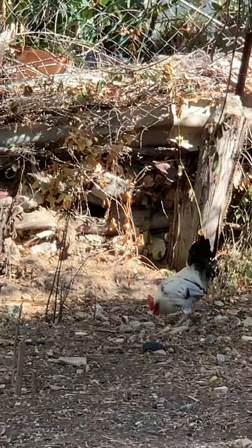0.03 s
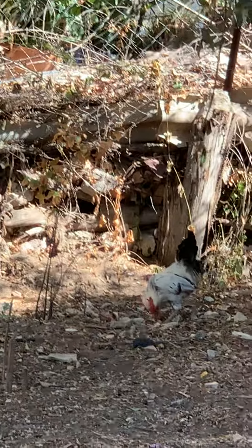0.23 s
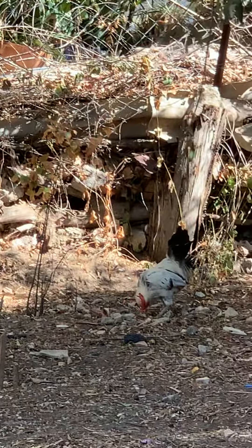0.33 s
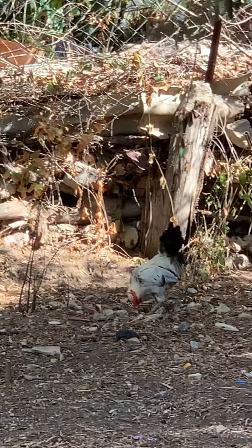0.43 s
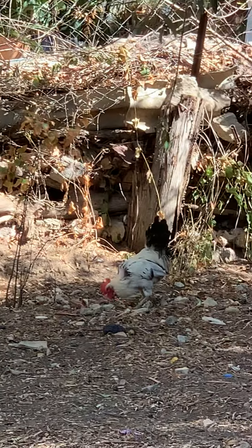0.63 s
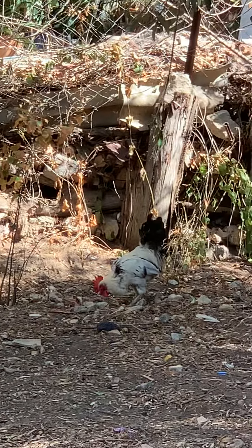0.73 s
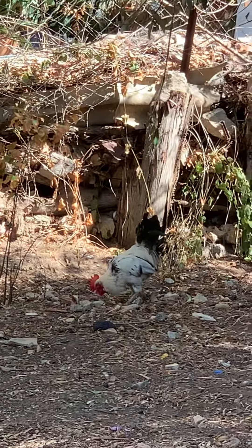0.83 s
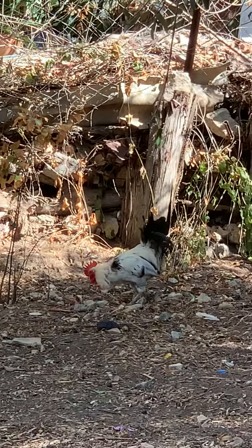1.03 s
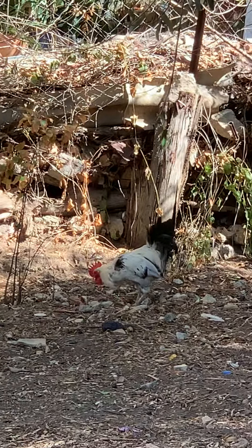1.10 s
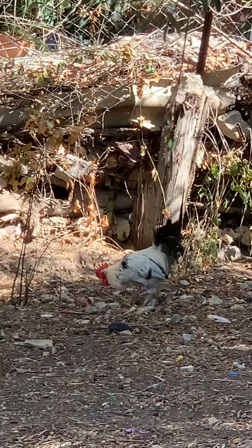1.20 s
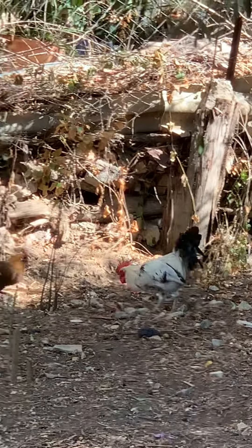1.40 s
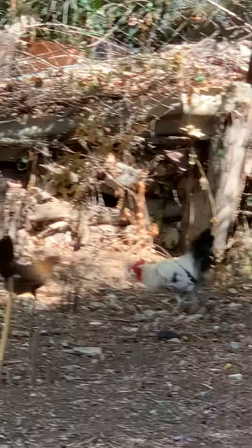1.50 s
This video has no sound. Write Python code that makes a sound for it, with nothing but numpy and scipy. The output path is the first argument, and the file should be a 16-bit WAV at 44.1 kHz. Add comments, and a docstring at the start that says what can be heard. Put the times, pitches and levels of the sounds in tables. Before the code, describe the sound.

A foraging rooster rakes dry stalks and stones with quick, crisp scratches and low, damped pecks. Outdoors, wind thumps and rustles on the microphone before easing, leaving faint hiss, a few quiet pecks and a light sweep.

```python
"""A yard with dry ground, where a rooster forages: three quick scratches, a few dull pecks, a light brush.
His claws snap and rub through the litter and set stalks and stones ringing; each peck is a low, damped knock.
Wind buffets the phone and rustles for the first half, then drops to a low rumble
under a faint, high outdoor hiss."""
import sys
import numpy as np
from scipy import signal
from scipy.fft import rfft, irfft
from scipy.io import wavfile

SR = 44100
rng = np.random.default_rng(int(sys.argv[2]) if len(sys.argv) > 2 else 0)


def unload_audio(sound):
    """Save the sound as a 16-bit wav file, at the path given as the first command line argument."""
    columns = np.transpose(np.atleast_2d(sound))
    # keep every value between -1 and 1, then stretch to whole-number steps
    steps = np.round(np.clip(columns, -1, 1) * 32767)
    wavfile.write(sys.argv[1], SR, steps.astype(np.int16))


N = 68355

# Soft, dark tone of wind rustle and kicked-up dust. Each row: frequency in Hz, relative level in dB.
RUSTLE_COLOUR = [(60, -8), (160, -2), (300, -2.5), (500, -6), (1000, -13.5), (1500, -17), (2400, -23.5),
                 (4800, -27.5), (7000, -37.5), (10000, -49.5)]


def undb(db):
    return 10 ** (np.asarray(db) / 20)


def times():
    return np.arange(N) / SR


def freqs():
    return np.arange(N // 2 + 1) * SR / N


def curve(at, rows):
    """Straight lines through a table of points."""
    rows = np.array(rows, float)
    return np.interp(at, rows[:, 0], rows[:, 1])


def colour(points):
    """An EQ curve: gain per bin from (Hz, dB) points."""
    hz, db = np.array(points, float).T
    return undb(np.interp(np.log(freqs() + 1), np.log(hz), db))


def bell(offset, width):
    """A smooth hump of height 1."""
    return np.exp(-.5 * (offset / width) ** 2)


def shaped(x, gain):
    """Filter, then bring to rms 1."""
    y = irfft(rfft(x) * gain, N)
    return y / np.sqrt(np.mean(np.abs(y) ** 2))


def at_ports(pair, gain):
    """Two unrelated signals become left and right, as alike as the microphone ports hear them."""
    # How alike the two ports sound. Each row: frequency in Hz, likeness from 0 to 1.
    likeness = [(700, 1), (950, 0.99), (1300, 0.21), (2000, 0.45), (2700, 0.89), (3900, 0.17), (4900, 0.85),
                (5900, .45), (7200, 0.57), (8500, 0.33), (9400, 1), (11000, 0.82), (12300, .99), (14000, 1)]
    alike = curve(freqs(), likeness)
    mid, side = irfft(rfft(pair) * np.sqrt([1 + alike, 1 - alike]), N)
    return shaped(np.array([mid + side, mid - side]), gain)


def noise(gain):
    """Coloured stereo noise of rms 1."""
    return at_ports(rng.standard_normal((2, N)), gain)


def wander(rate_hz):
    """A smooth random modulator of rms 1."""
    return shaped(rng.standard_normal(N), bell(freqs(), rate_hz))


def scratches():
    """Claws drag jerkily through litter: snaps and friction ring stalks and stones, damped by soil."""
    # Claw strokes. Each row: start and crest in seconds, level at each in dB, release in seconds.
    strokes = [(-.01, 0.002, -47, -63, 0.023), (0.034, 0.1, -66.5, -50.5, 0.04),
               (0.189, 0.251, -58.5, -48.5, 0.0091), (0.275, 0.32, -65.5, -63.5, 0.12),
               (.343, 0.393, -52.5, -53, 0.037)]
    # Crisp tone of dry litter. Each row: frequency in Hz, relative level in dB.
    litter_colour = [(700, -26.5), (1500, -16.5), (2500, -10), (3900, -11), (5000, 1), (5800, -10),
                     (7100, -11.5), (8200, -25.5), (9500, -49)]
    # Resonances of stalks and stones. Each row: pitch in Hz, width in Hz, relative level in dB.
    rings = [(2720, 42, -3.5), (3320, 130, -9), (3897, 37, -3), (4196, 170, -4), (4490, 88, 0),
             (4860, 30, 2), (5110, 160, -3.5), (5280, 40, -4.5), (5570, 54, -0.5), (6120, 16, -4.5),
             (6480, 42, -10)]
    attack_s, snaps_per_s, snap_spread_db, friction_db, jerk_db = 0.0095, 2600, -6, -2.5, 0.55
    t, effort = times(), 0
    for start, crest, start_db, crest_db, release in strokes:
        drag = undb(np.interp(t, [start, crest], [start_db, crest_db]))
        attack = np.clip((t - start) / attack_s, 0, 1)
        effort += drag * attack * np.exp(-np.maximum(t - crest, 0) / release)
    snaps = (rng.random((2, N)) < snaps_per_s / SR) * rng.standard_normal((2, N))
    snaps *= undb(snap_spread_db * np.minimum(rng.exponential(size=(2, N)), 3))
    force = shaped(snaps, 1) + undb(friction_db) * rng.standard_normal((2, N))
    ring_power = sum((undb(db) / (1 + (2 * (freqs() - hz) / width) ** 2)) ** 2 for hz, width, db in rings)
    scrape = at_ports(force, colour(litter_colour)) + noise(np.sqrt(ring_power))
    return shaped(scrape, 1) * effort * undb(jerk_db * wander(64))


def stalks():
    """Now and then a dry stalk catches under the claws and sings briefly on its own wavering pitch."""
    # Each row: centre in seconds, level in dB, pitch in Hz, half length in seconds.
    catches = [(.1, -56.5, 5430, .008), (.125, -62, 4870, .016), (.198, -60, 3290, .004),
               (.225, -54.5, 4885, .011), (.244, -57, 4500, .007), (.243, -55, 5300, .003),
               (.243, -64, 2690, .007), (.378, -63.5, 2690, .024), (.38, -63, 5207, .025)]
    waver_hz = 22
    t, out = times(), 0
    for at, db, hz, length in catches:
        phase = 2 * np.pi * np.cumsum(hz + waver_hz * wander(65)) / SR
        port_phase = rng.uniform(-3, 1, (2, 1))
        out += undb(db) * bell(t - at, length) * np.sin(phase + port_phase)
    return out


def pecks():
    """Each blow on the ground is a short low ring with a thud and a puff of dust."""
    # Dull pecks and knocks. Each row: start in seconds, gain in dB, pitch in Hz, decay in seconds.
    blows = [(0.206, -35.5, 292, 0.0025), (0.236, -36.5, 308, 0.0066), (0.289, -55.5, 278.8, 0.033),
             (1.233, -51, 316, 0.012), (1.302, -54.5, 348, 0.0091), (1.317, -50, 309, 0.012)]
    attack_s, thud_hz = .002, 220
    dust = undb(-18) * noise(colour(RUSTLE_COLOUR))
    thud = undb(-11) * noise(bell(freqs() - thud_hz, width=100))
    out = 0
    for start, db, hz, decay in blows:
        age = np.maximum(times() - start, 0)
        envelope = (1 - np.exp(-age / attack_s)) * np.exp(-age / decay)
        out += undb(db) * envelope * (dust + thud - np.sin(2 * np.pi * hz * age))
    return out


def brushes():
    """Light, bright sweeps that swell and fade with a fine flutter."""
    # Each row: centre in seconds, level in dB, half length in seconds.
    sweeps = [(1.394, -66.5, 0.035), (1.55, -74.5, 0.051)]
    # Their wispy tone. Each row: frequency in Hz, relative level in dB.
    brush_colour = [(1000, -15), (2600, -10.5), (4000, -10), (5200, -14), (6500, 1.5), (8200, -0.5),
                    (10500, -5.5), (13500, -7.5), (15000, -18)]
    swell = sum(undb(db) * bell(times() - at, length) for at, db, length in sweeps)
    return swell * noise(colour(brush_colour)) * undb(1.6 * wander(120))


def wind():
    """Eddies press on both ports alike, with a few stronger buffets and an airy rustle above."""
    # Wind pressure on the microphone. Each row: time in seconds, level in dB.
    pressure = [(0, -56.5), (.11, -64), (.145, -47.5), (.19, -52.5), (.25, -42), (.31, -51), (.39, -41),
                (.47, -40), (.52, -44), (.61, -35), (.65, -43), (.70, -33.5), (.765, -42), (.80, -57),
                (.88, -65.5), (1.0, -65.5), (1.33, -56.5), (1.45, -61), (1.55, -51.5)]
    # Deep tone of the eddies. Each row: frequency in Hz, relative level in dB.
    rumble_colour = [(15, -24.5), (30, -16.5), (50, -1), (66, 3), (82, -6.5), (105, -3), (135, -14),
                     (190, -30.5), (400, -52.5), (900, -66.5)]
    # Single buffets. Each row: centre in seconds, level in dB, pitch in Hz, half length in seconds.
    bumps = [(.27, -36, 67, 0.004), (.363, -28.5, 75, 0.0047), (.485, -28, 77.7, 0.0098),
             (.709, -27, 93.3, .015), (0.775, -33, 96.7, 0.0056), (0.829, -43.5, 67, 0.0061),
             (0.905, -51, 64, 0.0079), (1.111, -49, 63, 0.0093)]
    # Rise and fall of the rustle. Each row: time in seconds, level in dB.
    rustle_level = [(0, -67), (.085, -70), (.115, -58.5), (.16, -60.5), (.235, -61), (.268, -70),
                    (.293, -71), (.312, -58), (.37, -62), (.42, -60), (.55, -60.5), (.68, -59.5),
                    (.76, -58.5), (.79, -78), (1.15, -91.5), (1.35, -73), (1.55, -71)]
    t, steadiness = times(), 0.8
    rumble = signal.hilbert(shaped(rng.standard_normal(N), colour(rumble_colour)))
    compressed = rumble.real / (np.abs(rumble) + 0.23) ** steadiness
    eddies = shaped(compressed, bell(freqs(), 240)) * undb(curve(t, pressure))
    buffets = sum(undb(db) * bell(t - at, length) * np.cos(2 * np.pi * hz * (t - at))
                  for at, db, hz, length in bumps)
    rustle = noise(colour(RUSTLE_COLOUR)) * undb(curve(t, rustle_level) + 0.95 * wander(33))
    return eddies + buffets + rustle


def yard():
    """A bed of quiet air, a narrow high hiss and faint tones from far away."""
    # Steady outdoor air. Each row: frequency in Hz, relative level in dB.
    air_colour = [(40, 6), (160, -4), (330, -3.5), (500, -17.5), (900, -19.5), (1650, -14), (2300, -22.5),
                  (5300, -25), (8500, -23), (12000, -26), (14500, -31)]
    # Far-off tones. Each row: centre in seconds, level in dB, pitch in Hz, half length in seconds.
    far_tones = [(.675, -70, 1370, .03), (.98, -82, 1620, .06), (1.22, -75.5, 1560, .014),
                 (1.28, -80, 1450, .03)]
    air_db, hiss_db, hiss_hz = -69, -78, 6460
    air = noise(colour(air_colour)) * undb(air_db + 0.2 * wander(9.3))
    hiss = noise(bell(freqs() - hiss_hz, width=810)) * undb(hiss_db + 2.4 * wander(5))
    far = sum(undb(db) * bell(times() - at, length) * noise(bell(freqs() - hz, width=70))
              for at, db, hz, length in far_tones)
    return air + hiss + far


def scene():
    """The rooster's foraging, mixed with the wind and the yard."""
    return scratches() + stalks() + pecks() + brushes() + wind() + yard()


def record(dry):
    """The phone widens the treble by a lag between its ports and cuts the top."""
    # How far the right port trails the left. Each row: frequency in Hz, phase lag in radians.
    port_lag = [(0, 0), (1100, 0), (2000, 2.7), (4800, 3.15), (5700, 3.6), (6500, 6), (7500, 6.5),
                (9200, 9.4), (10300, 9.45), (11800, 12.55), (13000, 12.6), (14200, 15.6)]
    top_hz = 14400
    phase_turn = np.exp(.5j * np.array([[1], [-1]]) * curve(freqs(), port_lag))
    faded = dry * signal.windows.tukey(N, .004)
    wide = irfft(rfft(faded) * phase_turn, N)
    return signal.sosfilt(signal.ellip(8, .2, 70, top_hz, fs=SR, output="sos"), wide)


dry = scene()
out = record(dry)
unload_audio(out)
```